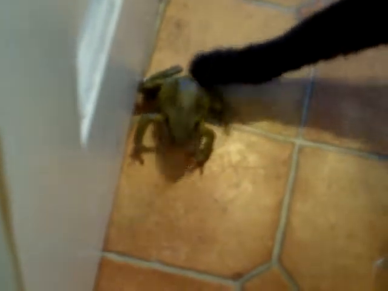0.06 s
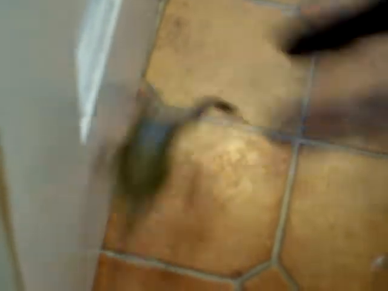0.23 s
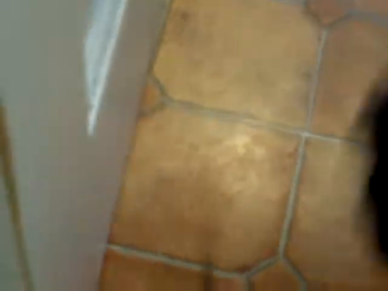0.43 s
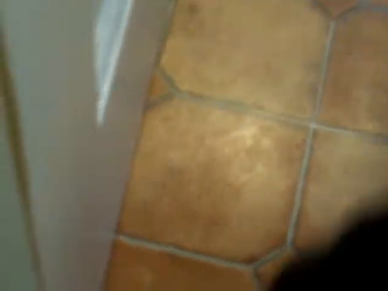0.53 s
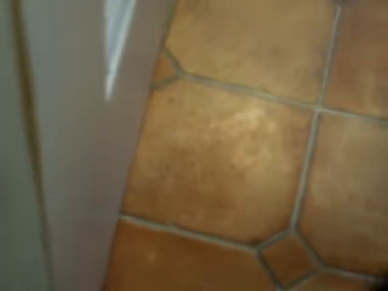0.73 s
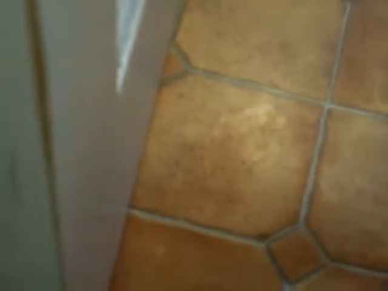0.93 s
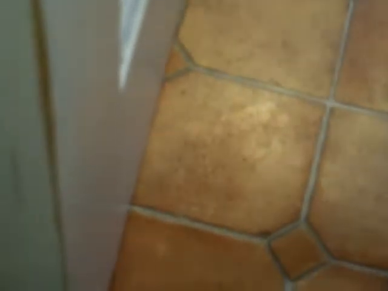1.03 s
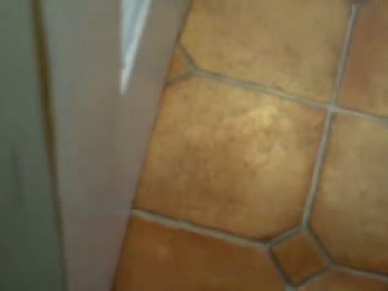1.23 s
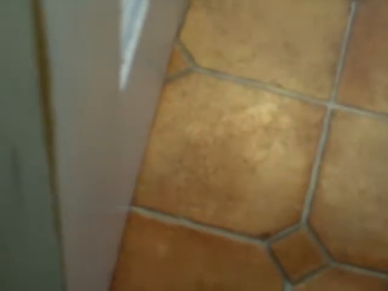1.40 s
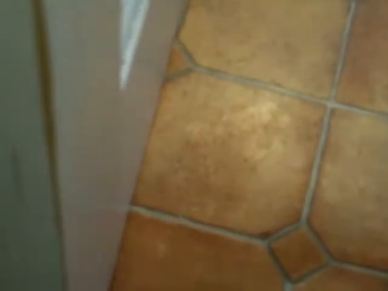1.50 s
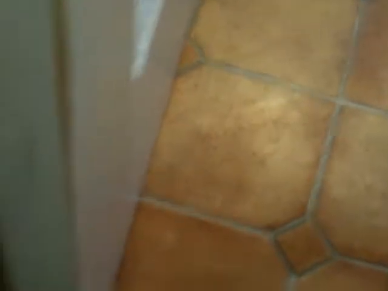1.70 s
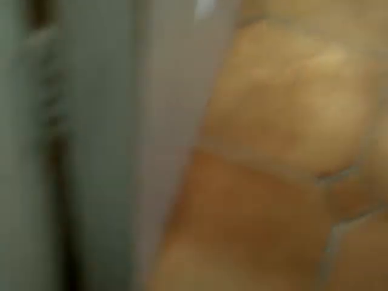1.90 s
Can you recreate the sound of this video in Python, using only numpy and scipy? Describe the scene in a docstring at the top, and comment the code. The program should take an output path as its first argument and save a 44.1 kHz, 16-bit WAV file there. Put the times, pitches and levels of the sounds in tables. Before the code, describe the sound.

A frog lets out a buzzy, falling squeal at about 0.2 seconds, running into a breathy whimper. At 0.5 seconds it slaps wetly against a cupboard panel. Soft floor bumps come near 0.4 and 1.3 seconds. At 1.6 seconds it gives a wavering croak that slows into a creak and clicks by 1.8. Steady hiss, a thin whine and faint electrical ticking fill the small kitchen.

```python
"""A small, hard kitchen with a tiled floor. A startled frog squeals as it leaps, whimpers, and slaps
wetly against a cupboard panel. A second later it gives a croak that slows into a creak. Each cry is
a train of vocal-fold pulses and puffs of air ringing the mouth; the slap is a cluster of quick blows
ringing the panel. The room answers both. Underneath sit soft bumps on the floor, a steady hiss,
a thin whine and a faint electrical ticking."""
import sys
import numpy as np
from scipy import signal
from scipy.fft import rfft, irfft
from scipy.io import wavfile
from scipy.ndimage import uniform_filter1d

SR = 44100
rng = np.random.default_rng(int(sys.argv[2]) if len(sys.argv) > 2 else 0)


def wrap_up_sound(samples):
    """Save the sound to the file named by the first command line argument, as 16-bit audio."""
    columns = np.atleast_2d(samples).T
    # keep every value between -1 and 1, then stretch to whole-number steps
    tamed = np.clip(columns, -1, 1)
    steps = np.round(tamed * 32767).astype(np.int16)
    wavfile.write(sys.argv[1], SR, steps)


N = 85995
T = np.arange(N) / SR

# Tone of the hiss bed: freq_hz, gain_db
HISS_EQ = [(15, -43), (25, -2), (228, -5), (413, -6.5), (652, -8), (6450, -16), (12700, -16), (14500, -15),
           (15700, -15)]
# Reverb time of the kitchen: freq_hz, t60_s
ROOM_DECAY = [(100, 0.41), (500, 0.41), (1200, 0.26), (3000, 0.37), (9000, 0.33), (16000, 0.12)]
# Soft, low bumps of movement on the floor: centre_s, spread_s, pitch_hz, level_db
FLOOR_BUMPS = [(0.365, 0.014, 104, -46.5), (0.407, 0.022, 151, -52.5), (1.298, 0.031, 83, -45)]
# Tone of the dull scuff: freq_hz, gain_db
SCUFF_EQ = [(60, -3), (150, -2.5), (500, -5), (900, -9), (3000, -42), (16000, -77)]
# Body and limbs hitting the panel: start_s, blow_db, splat_db
BODY_BLOWS = [(.4834, -35, -40), (.4853, -13, -32), (.4863, -8.2, -24), (.4883, -9.5, -25.5),
              (.5073, -18, -28), (.5082, -20, -32), (.5111, -19.5, -27), (.512, -25, -31)]
# Ringing modes of the cupboard panel: freq_hz, gain_db, t60_s
PANEL_MODES = [(106, -33.5, 0.2), (154, -31, 0.18), (275, -21, 0.028), (497, -10.5, 0.024),
               (576, -12, 0.018), (940, -24, 0.057), (1054, 4.5, 0.0072), (1086.6, -29.5, 0.12),
               (1265, -7.5, 0.014), (1682, -16, .032), (2133, -19.5, 0.027), (2476, -25.5, 0.062)]
# Tone of wet skin slapping: freq_hz, gain_db
SPLAT_EQ = [(200, 7), (1500, 12), (3500, 2), (6000, 1.5), (8000, -4.5), (10000, 1), (13000, -4.5),
            (16000, -6)]
# The band that the mouth lets out: freq_hz, gain_db
MOUTH_EQ = [(300, -18), (650, -17.5), (1000, 1), (1600, 0), (2450, 0.5), (3000, 2), (3800, -9.5),
            (8000, -28.5)]
# Broad buzz that bypasses the resonances: freq_hz, gain_db
BUZZ_EQ = [(300, -38), (650, -6), (1100, -14.5), (2700, -7), (3700, -4), (4400, 1), (5100, -3.5),
           (6600, -5), (7100, 2), (7500, -9), (8200, 1.5), (10500, -2), (16000, -6)]
# The squeal, leaping up and sliding down: time_s, pitch_hz, voice_db, ring_db, mouth_hz
SQUEAL_CURVE = [(.188, 491, -40, -68, 1500), (.204, 565, -44, -62, 1750), (.216, 638, -41, -45, 1800),
                (.228, 631, -41, -41, 1860), (.24, 614.3, -39.5, -40.5, 1780),
                (.264, 536.4, -39.5, -47, 1880), (.285, 508, -42, -35, 1800), (.302, 484, -40.5, -47, 1600),
                (.338, 465.3, -43.5, -51, 1660), (.356, 393, -40.5, -51, 1600)]
# The whimper just before the slap: time_s, pitch_hz, voice_db, ring_db, mouth_hz
WHIMPER_CURVE = [(.353, 378, -53, -49, 1400), (.382, 414.8, -43, -62, 1550),
                 (.418, 435.2, -43, -45.5, 1750), (.44, 419.5, -39, -52, 2143),
                 (.458, 409.4, -50.5, -44, 2220), (.471, 400, -57.5, -52, 2020),
                 (.483, 382, -31, -47, 1800)]
# The wavering croak: time_s, pitch_hz, voice_db, ring_db, mouth_hz
CROAK_CURVE = [(1.593, 437.3, -36.5, -50, 1380), (1.609, 391.9, -45, -42.5, 1420),
               (1.639, 444.8, -37, -47, 1870), (1.655, 432, -36.5, -52, 2120),
               (1.667, 395.2, -37.5, -44.5, 2330), (1.68, 337, -37.5, -42.5, 2250)]
# The croak's slowing, creaky tail: time_s, pitch_hz, voice_db, ring_db, mouth_hz
CREAK_CURVE = [(1.691, 257.8, -39, -55, 2320), (1.704, 185.3, -39, -53, 2370),
               (1.715, 152.3, -53, -51, 2330), (1.73, 112, -66, -70, 2300)]
# Last single snaps of the throat: start_s, gain_db
THROAT_SNAPS = [(1.7354, -3.5), (1.741, -16), (1.7542, -8.5), (1.788, -17), (1.7973, -12.5)]

TOP_HZ = 15800  # ceiling of the voice's overtones and of the whole mix


def amp(db):
    """Decibels to gain."""
    return 10 ** (np.asarray(db) / 20)


def unit(x):
    """Scales to rms 1."""
    return x / np.sqrt(np.mean(x ** 2) + 1e-20)


def curve_at(points, hz):
    """Reads a table on a log-frequency axis."""
    freqs, values = np.transpose(points)
    return np.interp(np.log(hz + 1), np.log(freqs + 1), values)


def add(mix, start_s, sound):
    """Drops a sound into the mix at its cue."""
    part = mix[round(start_s * SR):][:len(sound)]
    part += sound[:len(part)]


def equalise(x, eq):
    """Minimum-phase EQ: nothing rings ahead of a pulse."""
    size = 8192
    log_gain = np.log(amp(curve_at(eq, abs(np.fft.fftfreq(size, 1 / SR)))))
    response = np.exp(np.conj(signal.hilbert(log_gain)))
    taps = np.fft.ifft(response).real[:size // 2]
    return signal.fftconvolve(x, taps)[:len(x)]


def noise(eq):
    """Coloured noise of rms 1."""
    gain = amp(curve_at(eq, np.fft.rfftfreq(N, 1 / SR)))
    return unit(irfft(rfft(rng.standard_normal(N)) * gain, N))


def resonate(x, hz, width_hz):
    """A steep resonance whose centre can glide."""
    carrier = np.exp(2j * np.pi * np.cumsum(hz * np.ones(len(x))) / SR)
    pole = np.exp(-np.pi * width_hz / SR)
    baseband = signal.lfilter([(1 - pole) ** 2], [1, -2 * pole, pole * pole], x / carrier)
    return 2 * (carrier * baseband).real


def smooth(x, size):
    """Two moving averages, each size samples long."""
    return uniform_filter1d(uniform_filter1d(x, size), size)


def steady(x):
    """Rides the short-term level to hold it at 1."""
    return x / np.sqrt(abs(smooth(x ** 2, size=400)) + 1e-12)


def wander(count, size):
    """Smooth random drift of rms 1."""
    return unit(smooth(rng.standard_normal(count), size))


def noise_band(hz, width_hz):
    """A band of noise at an even level."""
    return steady(resonate(rng.standard_normal(N), hz, width_hz))


def electrical_bed(tick_hz=30, first_tick_s=0.002, tick_spread_s=0.002, whine_hz=15030, thin_hz=13183.5):
    """Hiss, faint ticking and two thin whines; the louder whine flips polarity on every tick."""
    cycles = (T - first_tick_s) * tick_hz
    flip = np.clip(12 * np.sin(np.pi * cycles), -1, 1)
    whine = amp(-60.5) * flip * np.sin(2 * np.pi * whine_hz * T)
    whine += amp(-69.5) * np.sin(2 * np.pi * thin_hz * T)
    from_tick_s = ((cycles + 0.5) % 1 - 0.5) / tick_hz
    ticks = np.exp(-(from_tick_s / tick_spread_s) ** 2) * noise_band(hz=7600, width_hz=900)
    return amp(-53) * noise(HISS_EQ) + np.sqrt(2) * whine + amp(-58) * ticks


def room(x, wet_db, delay_s):
    """Direct sound plus dense reflections off tile and cupboards."""
    t = T[:SR // 2]
    hz, times, spectrum = signal.stft(rng.standard_normal(len(t)), SR, nperseg=256)
    decay = amp(-60 * times / curve_at(ROOM_DECAY, hz)[:, None])
    fade_in = np.clip(t / delay_s - 1, 0, 1)
    tail = signal.istft(spectrum * decay, SR)[1][:len(t)] * fade_in
    return x + amp(wet_db) * signal.fftconvolve(x, tail / np.linalg.norm(tail))[:N]


def floor_movement(scuff_s=0.361, scuff_spread_s=0.023):
    """Movement on the floor: dull bumps and one soft scuff."""
    bumps = sum(amp(db) * np.exp(-((T - s) / spread) ** 2) * np.cos(2 * np.pi * hz * (T - s))
                for s, spread, hz, db in FLOOR_BUMPS)
    scuff = np.exp(-((T - scuff_s) / scuff_spread_s) ** 2) * noise(SCUFF_EQ)
    return bumps + amp(-50) * scuff


def panel_slap(contact_s=0.00045, splat_decay_s=0.0013, low_cut_hz=116):
    """Quick blows ring the panel, wet skin tops each with a splat, and the room answers both."""
    knock, splat_envelope = np.zeros(N), np.zeros(N)
    for start_s, blow_db, splat_db in BODY_BLOWS:
        t = np.maximum(T[:N // 2] - start_s, 0)
        ring = sum(amp(db - 60 * t / t60) * np.sin(2 * np.pi * hz * t) for hz, db, t60 in PANEL_MODES)
        attack = 1 - np.exp(-t / contact_s)
        add(knock, 0, amp(blow_db) * attack * ring)
        add(splat_envelope, 0, amp(splat_db) * attack * np.exp(-t / splat_decay_s))
    knock = signal.sosfilt(signal.butter(3, low_cut_hz, "high", fs=SR, output="sos"), knock)
    knock = room(knock, wet_db=-13, delay_s=0.0023)
    splat = amp(4.5) * splat_envelope * noise(SPLAT_EQ)
    return knock + room(splat, wet_db=-7, delay_s=0.00071)


def chirp(centre_s=0.179, spread_s=0.004, hz=3030, fall_hz_per_s=45000):
    """A tiny falling squeak just ahead of the squeal."""
    t = T - centre_s
    return amp(-50) * np.exp(-(t / spread_s) ** 2) * np.sin(2 * np.pi * (hz - fall_hz_per_s * t / 2) * t)


def air_pop(start_s=1.5924, attack_s=0.00054, decay_s=0.0093):
    """A rough burst of air as the folds spring open for the croak."""
    t = np.maximum(T - start_s, 0)
    envelope = np.minimum(t / attack_s, 1) * np.exp(-t / decay_s)
    return amp(-30.5) * envelope * noise_band(hz=1360, width_hz=530)


def throat_snaps():
    """The creak breaks up into single clicks of the throat."""
    clicks = np.zeros(N)
    for start_s, db in THROAT_SNAPS:
        add(clicks, start_s, amp([db]))
    return resonate(clicks, hz=2170, width_hz=550) + amp(-2) * resonate(clicks, hz=1350, width_hz=810)


def fold_pulses(cycles, hz, clap, open_share=0.49, clap_from_hz=2300):
    """A pulse as the folds open and a thin clap as they shut, hollowing out the high even overtones."""
    pulses = np.zeros(len(hz))
    for k in range(1, int(TOP_HZ / hz.min())):
        opening = np.cos(2 * np.pi * k * cycles)
        clap_gain = clap * np.clip(2 * (k * hz / clap_from_hz - 1), 0, 1)
        closing = clap_gain * np.cos(2 * np.pi * k * (cycles - open_share))
        pulses += (opening - closing) * np.clip((TOP_HZ - k * hz) / hz, 0, 1)
    return steady(pulses)


def cry(curve, mouth_width_hz, ring_glide_hz, jitter, shimmer_db, breath, high_breath,
        sizzle_db, buzz_db, buzz_fade_db, clap, attack_s):
    """Sharp fold pulses, each with a puff of air, ring the mouth and two gliding high resonances."""
    times, *columns = np.transpose(curve)
    t = np.arange(times[0], times[-1], 1 / SR)
    hz, voice_db, ring_db, mouth_hz = (np.interp(t, times, column) for column in columns)
    progress = np.linspace(0, 1, len(t))
    ring_hz = np.linspace(*ring_glide_hz, len(t))
    hz *= 1 + jitter * wander(len(t), size=70)
    cycles = np.cumsum(hz) / SR
    folds = fold_pulses(cycles, hz, clap * np.sin(np.pi * progress) ** 2)
    folds *= amp(shimmer_db * wander(len(t), size=60))
    puffs = steady(np.exp(-(cycles % 1) / 0.42) * rng.standard_normal(len(t)))
    mouth_drive, high_drive = folds + breath * puffs, folds + high_breath * puffs
    mouth = steady(equalise(resonate(mouth_drive, mouth_hz, mouth_width_hz), MOUTH_EQ))
    ring = steady(resonate(high_drive, ring_hz, width_hz=580))
    sizzle = steady(resonate(high_drive, 1.39 * ring_hz, width_hz=1600))  # rides above the ring
    buzz = amp(buzz_db + buzz_fade_db * progress) * steady(equalise(high_drive, BUZZ_EQ))
    voice = amp(voice_db) * (mouth + amp(sizzle_db) * sizzle + buzz) + amp(ring_db) * ring
    fades = np.clip(np.minimum((t - t[0]) / attack_s, (t[-1] - t) / 0.001), 0, 1)
    track = np.zeros(N)
    add(track, times[0], voice * fades)
    return track


def near_scatter(voice, spread_s=0.0032):
    """The voice plus early reflections off the tiles and cupboard right beside the frog."""
    t = T[:SR // 40]
    scatter = rng.standard_normal(len(t)) * t / spread_s * np.exp(-2 * t / spread_s)
    return voice + amp(-17) * signal.fftconvolve(voice, scatter / np.linalg.norm(scatter))[:N]


def frog():
    """The lead voice: a buzzy squeal, a breathy whimper, then a croak that runs down into clicks."""
    squeal = cry(SQUEAL_CURVE, mouth_width_hz=1940, ring_glide_hz=(8820, 9500),
                 jitter=0.009, shimmer_db=0.9, breath=0.061, high_breath=0.36,
                 sizzle_db=-8, buzz_db=-0.5, buzz_fade_db=-7, clap=0.45, attack_s=0.015)
    whimper = cry(WHIMPER_CURVE, mouth_width_hz=1150, ring_glide_hz=(9400, 9060),
                  jitter=0.0062, shimmer_db=-0.8, breath=0.18, high_breath=0.25,
                  sizzle_db=-14, buzz_db=-6.5, buzz_fade_db=-5, clap=0, attack_s=0.004)
    croak = cry(CROAK_CURVE + CREAK_CURVE, mouth_width_hz=1330, ring_glide_hz=(9390, 9600),
                jitter=0.0064, shimmer_db=-0.5, breath=0.059, high_breath=0.26,
                sizzle_db=-17.5, buzz_db=-11.5, buzz_fade_db=-3.5, clap=0, attack_s=0.0008)
    croak += throat_snaps()
    body_ring = amp(-6) * resonate(croak, hz=2340, width_hz=250)  # hangs on between the pulses
    voice = chirp() + squeal + whimper + air_pop() + amp(-0.5) * (croak + body_ring)
    return amp(-0.53) * near_scatter(voice)


def scene():
    """Mono mix: cries and slap in the kitchen, over floor bumps and the electrical bed."""
    cries = room(frog(), wet_db=-8.5, delay_s=0.0021)
    return (cries + panel_slap() + floor_movement() + electrical_bed())[None]


def record(dry):
    """A steep high cut on the whole mix."""
    high_cut = signal.firwin(611, TOP_HZ, window=("kaiser", 9), fs=SR)
    return signal.oaconvolve(dry, high_cut[None], "same")


dry = scene()
out = record(dry)
wrap_up_sound(out)
```